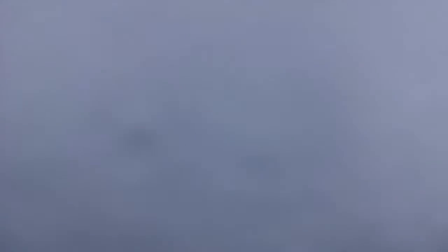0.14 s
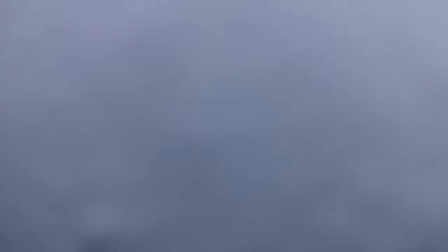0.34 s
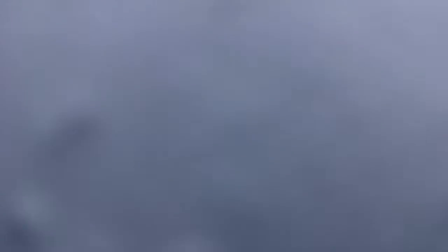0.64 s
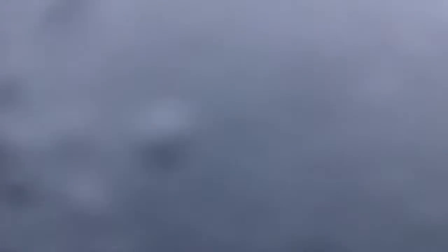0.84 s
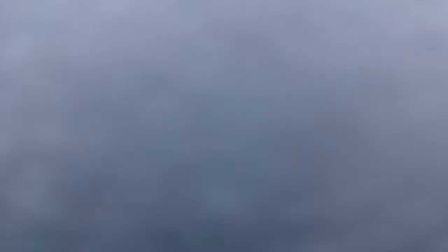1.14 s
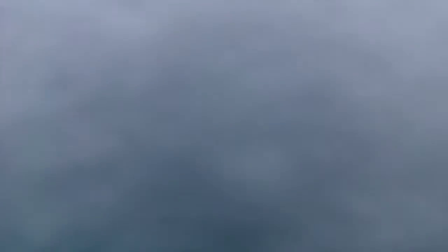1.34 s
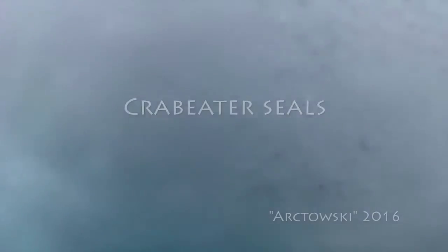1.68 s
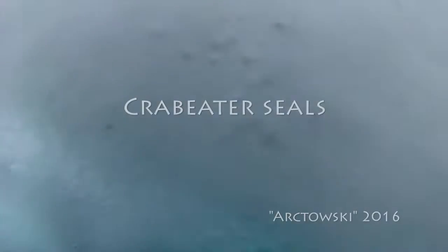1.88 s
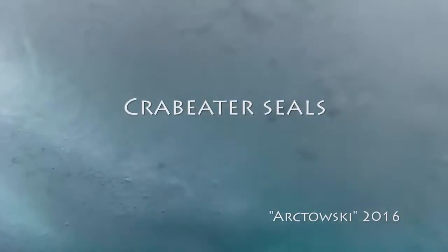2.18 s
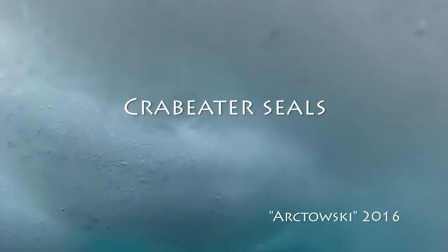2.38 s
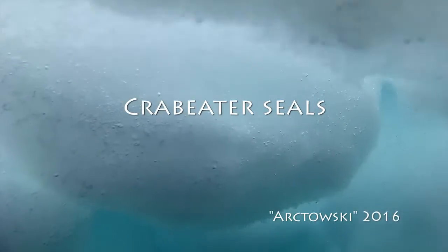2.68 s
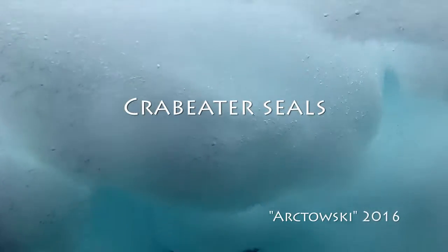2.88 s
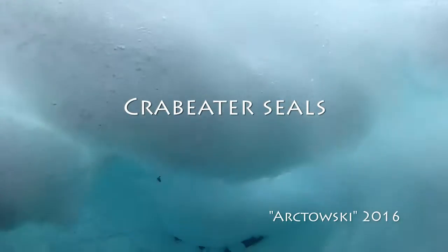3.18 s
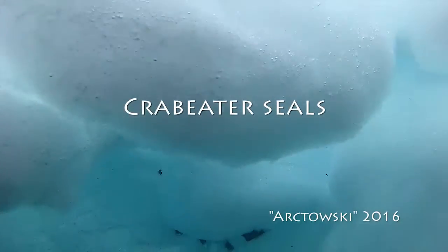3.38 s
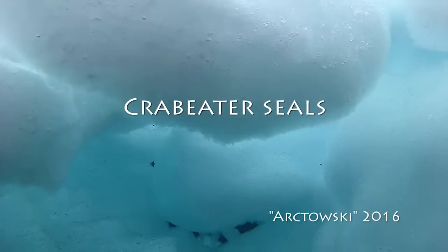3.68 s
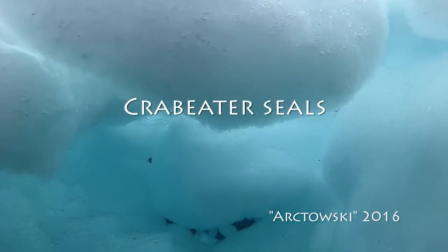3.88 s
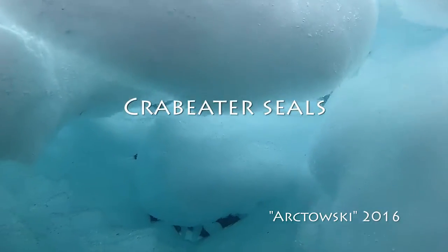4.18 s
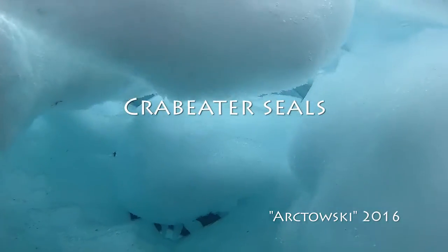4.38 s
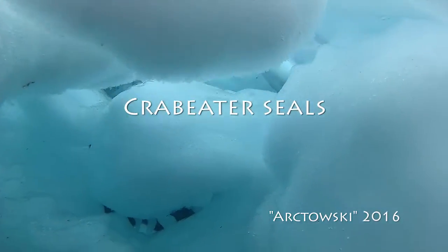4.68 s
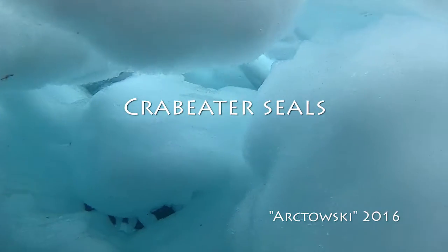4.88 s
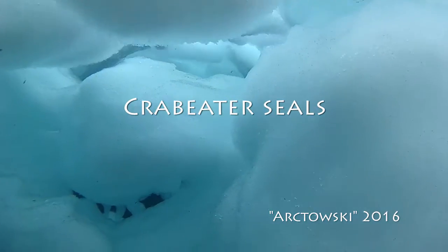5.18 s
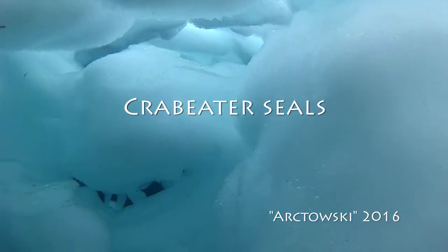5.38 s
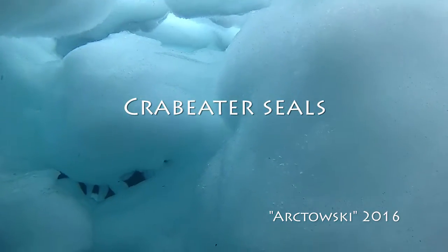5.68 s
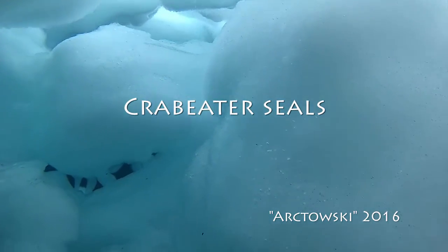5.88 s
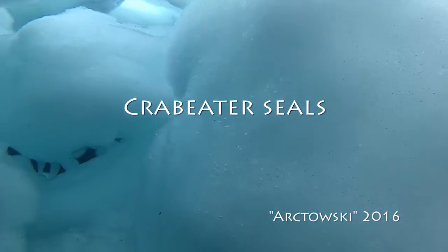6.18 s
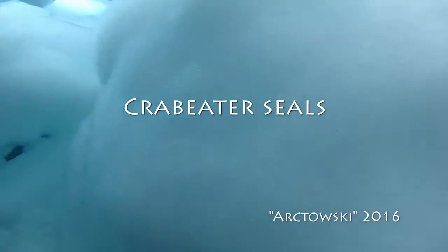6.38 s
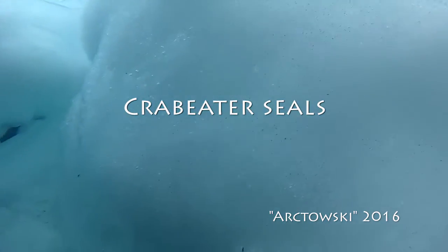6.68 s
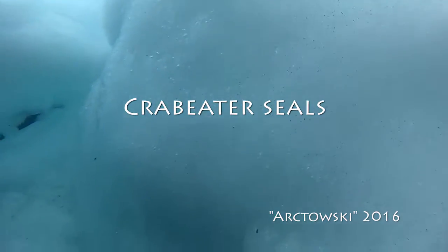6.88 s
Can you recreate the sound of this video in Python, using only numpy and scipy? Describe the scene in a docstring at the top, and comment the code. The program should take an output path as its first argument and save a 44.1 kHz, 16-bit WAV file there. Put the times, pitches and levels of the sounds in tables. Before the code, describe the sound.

Dense sharp ice cracks and popping bubbles up close, a buzzing creak, sparse knocks and scraping, then an abrupt stop leaving faint wind-like rumble.

```python
"""Brash ice crackles and snaps against the housing of a camera dipping into icy water, then thins out.
Close by, air pops, bubbles knock and blocks clonk, all as short dying sines; the crackle is random clicks in clumps.
A pulsing drone, probably ice creaking as it sticks and slips, rings the housing once per slip; ice scrapes further off.
The underwater sound stops dead after six seconds, leaving filtered noise: a low rumble like wind on the microphone."""
import sys
import numpy as np
from scipy import signal
from scipy.fft import rfft, irfft
from scipy.io import wavfile
from scipy.ndimage import uniform_filter1d

SR = 44100
rng = np.random.default_rng(int(sys.argv[2]) if len(sys.argv) > 2 else 0)


def wav_record(signal):
    """Record a signal, one row per channel, as 16-bit PCM in the file named by sys.argv[1]."""
    frames = np.transpose(np.atleast_2d(signal))
    bounded = np.clip(frames, -1, 1)
    # unit amplitude maps onto the largest positive 16-bit level
    quanta = np.round(bounded * 32767).astype(np.int16)
    wavfile.write(sys.argv[1], SR, quanta)


N = 310905
TIME = np.arange(N) / SR


def amp(db):
    """Decibels to a linear gain."""
    return 10 ** (np.asarray(db) / 20)


def evened(x):
    """Scales to rms 1."""
    return x / np.sqrt(np.mean(x ** 2) + 1e-20)


def peaked(x):
    """Scales to peak 1."""
    return x / abs(x).max()


def noise():
    """White noise for the whole scene."""
    return rng.standard_normal(N)


def curve(rows):
    """Second column of a table of times, at every sample."""
    rows = np.asarray(rows)
    return np.interp(TIME, rows[:, 0], rows[:, 1])


def add(mix, s, sound):
    """Adds a sound into the mix at s seconds."""
    part = mix[max(round(s * SR), 0):][:len(sound)]
    part += sound[:len(part)]


def ramp(start, length):
    """Rises straight from 0 to 1."""
    return np.clip((TIME - start) / length, 0, 1)


def surge(start, end, db, rise, fall):
    """Exponential attack, a hold from start to end, exponential release."""
    before, after = np.maximum(start - TIME, 0), np.maximum(TIME - end, 0)
    return amp(db) * np.exp(-before / rise - after / fall)


def together(gains):
    """Sums envelopes by power."""
    return np.sqrt(sum(gain ** 2 for gain in gains))


def colour(x, points, size=4096):
    """Causal minimum-phase filter with the given spectrum."""
    hz, db = np.transpose(points)
    bins_hz = abs(np.fft.fftfreq(size, 1 / SR))
    log_gain = np.log(amp(np.interp(np.log(bins_hz + 1), np.log(hz), db)))
    taps = np.fft.ifft(np.exp(np.conj(signal.hilbert(log_gain)))).real[:size // 2]
    return signal.oaconvolve(x, taps)[:len(x)]


def band(x, lo_hz, hi_hz, order=2):
    """Butterworth band-pass."""
    edges = [lo_hz, min(hi_hz, .45 * SR)]
    return signal.sosfilt(signal.butter(order, edges, "band", fs=SR, output="sos"), x)


def drift(per_s):
    """Slow random wander of rms 1, with little above per_s hertz."""
    rolloff = 1 + (np.fft.rfftfreq(N, 1 / SR) / per_s) ** 4
    return evened(irfft(rfft(noise()) / rolloff, N))


def clicks(per_s, spread_db):
    """Random clicks, many small and a few large, equally loud however dense."""
    size = amp(spread_db * np.minimum(rng.exponential(1, N), 3.5))
    sign = rng.choice([-1, 1], N)
    present = rng.random(N) < per_s / SR
    return evened(size * sign * present / np.sqrt(per_s))


BUBBLE_RISE_MAX = 0.07  # greatest share by which a pitch rises


def ring(t, hz, t60, swell, glide=0):
    """A dying sine with a soft start, which may glide upward."""
    turns = hz * (t + np.cumsum(np.minimum(glide * t, BUBBLE_RISE_MAX)) / SR)
    decay = np.exp(-np.log(1000) * t / t60)
    return np.sin(2 * np.pi * turns) * decay * (1 - np.exp(-(t / swell) ** 2))


def pops(lo_hz, hi_hz, per_s, cycles, count=10):
    """Tiny bubbles of many sizes, each ringing a few cycles at its own pitch; rms 1."""
    t = np.arange(1500) / SR
    total = 0
    for hz in np.geomspace(lo_hz, hi_hz, count):
        starts = clicks(per_s / count, spread_db=2.0)
        total = total + signal.oaconvolve(starts, ring(t, hz, cycles / hz, 1 / hz))[:N]
    return evened(total)


# Sharp cracks of ice. Each row: start in seconds, snap peak in dB, centre in Hz,
# low thud and bright edge in dB relative to the snap, before the trims thud_db and edge_db.
CRACKS = [(0.101, -14, 1350, -4, -41), (0.1232, -22.5, 1500, -0.5, -24), (0.165, -6.5, 1990, -7.5, -24),
          (0.3683, -10.5, 1690, -23, -27), (0.4292, -13, 2010, -19.5, -14), (0.435, -5, 1770, -17.5, -17),
          (0.4402, -10, 1460, -1.5, -21.5), (0.4596, -14.5, 1830, -3, -39.5),
          (0.4837, -10.5, 1350, -16, -22.5), (0.5794, -15, 1610, -6, -11.5), (0.6431, -19, 1680, -9, -18),
          (0.6773, -14, 1830, -34, -5.5), (0.7302, -5.5, 1930, -11.5, -13), (0.756, -7, 1810, -12, -15),
          (0.7629, -18, 1510, 0.5, -12), (1.189, -17.5, 1460, -47, -7.5), (1.3304, -20, 3470, -39, -3),
          (1.631, -25, 1440, -25, -2.5), (1.909, -28, 2570, -18, -2), (2.1032, -25.5, 1780, -40, -7.5),
          (2.705, -24.5, 1460, -25, -3), (3.3135, -34, 1250, -21, -23.5), (3.341, -38, 1860, -6, -16),
          (4.957, -37.5, 2000, -14, -12)]
# Spectrum of ice breaking close to the housing. Each row: frequency in Hz, gain in dB.
CRACKLE_COLOUR = [(35, -56), (60, -24), (249, -12), (325, -4), (456, -13), (606, 6.5), (737, -4),
                  (880, -19.5), (997, -7.5), (1210, -8.5), (1450, 1), (1860, 0), (2510, -11), (2950, -4),
                  (4210, -16), (5470, -67), (9260, -120)]
# Spectrum of splintering ice. Each row: frequency in Hz, gain in dB.
EDGE_COLOUR = [(300, -54), (1500, -10.5), (2500, 3.5), (3400, 4.5), (4300, -14.5), (5700, -22),
               (7800, -50.5), (10000, -44), (13000, -54.5)]


def cracks(scatter=0.073, scatter_s=0.0044, pop_t60=0.011, pop_db=1, thud_db=1, thud_hz=470, edge_db=3):
    """Each crack is a snap and a brief pitched pop, with splinters, a bright edge and a thud on the housing."""
    out, t = np.zeros(N), np.arange(2048) / SR
    for s, db, hz, low_db, high_db in CRACKS:
        splinters = scatter * rng.standard_normal(len(t)) * np.exp(-t / scatter_s)
        burst = splinters + (t == 0)  # the first break is a single click
        snap = evened(band(colour(burst, CRACKLE_COLOUR), hz / 1.55, hz * 1.166))
        snap = peaked(snap + amp(pop_db) * evened(ring(t, hz, pop_t60, 0.00073)))
        thud = evened(band(band(burst, 310, 840, order=1), 40, 1100))
        thud = evened(thud + 0.42 * evened(ring(t, thud_hz, 0.0062, 0.00012)))
        edge = evened(colour(burst, EDGE_COLOUR))
        extras = amp(low_db + thud_db) * thud + amp(high_db + edge_db) * edge
        add(out, s, amp(db) * (snap + snap.std() * extras))
    return out


# Small bright ticks, like air escaping the ice. Each row: start in seconds, peak in dB.
TICKS = [(1.979, -29), (2.129, -32.5), (2.3882, -34.5), (2.418, -23.5), (2.436, -34.5), (2.569, -45),
         (2.682, -40.5), (2.762, -44.5), (3.4813, -38), (3.532, -45.5), (4.195, -45), (4.864, -36),
         (4.925, -40)]


def ticks():
    """Each tick is a burst of noise dying within milliseconds, coloured like splintering ice."""
    out, t = np.zeros(N), np.arange(2048) / SR
    for s, db in TICKS:
        burst = rng.standard_normal(len(t)) * np.exp(-t / 0.002)
        add(out, s, amp(db) * peaked(colour(burst, EDGE_COLOUR)))
    return out


# Speed of the creak. Each row: time in seconds, slips per second.
SLIP_RATE = [(0.857, 44.935), (1.435, 34.65), (1.644, 34.59), (1.882, 59.01), (2.386, 61.68),
             (2.939, 57.21), (3.072, 58.8), (3.402, 39.4), (5.226, 45.66), (5.419, 41.35), (5.646, 48.34),
             (6.1, 45.24)]


def slip_train():
    """One unit click for each slip of the creaking ice, slightly uneven in time."""
    jitter = .008 * drift(per_s=35)  # in slips
    started = TIME > SLIP_RATE[0][0]
    turns = np.cumsum(curve(SLIP_RATE) * started) / SR + jitter
    return np.diff(np.floor(np.maximum(turns, 0)), prepend=0)


# The fine crackle falls into step with the creak: burst decay (s), share of power, start (s), fade-in (s)
BURST_S, BURST_SHARE, BURST_START_S, BURST_FADE_S = .0025, .6, 1.3, .7


def bunching(slips):
    """Gain that gathers the fine crackle into a short burst at each slip."""
    decay = np.exp(-np.arange(1500) / SR / BURST_S)
    bursts = signal.oaconvolve(slips, decay)[:N] / (BURST_S * curve(SLIP_RATE))
    share = BURST_SHARE * ramp(BURST_START_S, BURST_FADE_S)
    return uniform_filter1d(np.sqrt(1 - share + share * abs(bursts)), size=60)


GRIND_END_S, GRIND_FADE_S, GRIND_DROP_DB = 1, 0.12, 11  # grinding drops as the ice lets go of the housing
CRACKLE_END_S, HANDOVER_S = 2.47, 0.029  # the near crackle gives way to the far scraping
CRUNCH_RISE_S, CRUNCH_FALL_S = 0.0031, 0.0081
# How hard the ice crackles, before the layer trims. Each row: time in seconds, level in dB.
CRACKLE = [(0.0, -31.5), (0.078, -41.5), (0.085, -32), (0.12, -34), (0.63, -31), (0.89, -33.5), (1.06, -33),
           (1.14, -34.5), (1.28, -38.5), (1.37, -47), (1.98, -44), (2.15, -49), (2.28, -54), (2.41, -58)]
# Pieces crushed against the housing, each a short rush of crackle.
# Each row: start in seconds, length in seconds, level in dB before the layer trims.
CRUNCHES = [(0.107, 0.023, -26), (0.179, 0.038, -32.5), (0.769, 0.026, -27), (2.298, 0.19, -54)]
# Tiny fractures. Each row: time in seconds, fractures per second.
FRACTURES = [(1.2, 1400), (1.5, 1200), (2.2, 900)]
# Spectrum of the fizz. Each row: frequency in Hz, gain in dB.
FIZZ_COLOUR = [(2000, -26), (3200, 4.5), (3700, 7), (4400, -10), (5700, -15.5), (7000, -36.5), (8000, -47),
               (10000, -33), (12500, -47)]


def crackle(slips, level_db=-1, grind_db=-12.5, fizz_db=-13, clump_db=1.0, pops_db=-1, gurgle_db=-2):
    """Clumps of tiny fractures and bubbles over hiss, with coarse grinding and gurgling below and fizz above."""
    bursts = bunching(slips)
    clumps = amp(clump_db * drift(per_s=80)) * bursts
    hiss = .25 * noise()
    fractures = (clicks(per_s=curve(FRACTURES), spread_db=2.2) + hiss) * clumps
    body = evened(band(colour(fractures, CRACKLE_COLOUR), 780, 3850, order=4))
    popping = pops(1250, 2100, per_s=200, cycles=12) + .5 * pops(2300, 3500, per_s=200, cycles=21)
    body = body + amp(pops_db) * bursts * evened(popping)

    coarse = clicks(per_s=240, spread_db=4.5) * clumps
    grind = evened(band(colour(coarse, CRACKLE_COLOUR), 130, 720, order=3))
    grind = grind + amp(gurgle_db) * pops(470, 680, per_s=47, cycles=6.3)
    contact_db = -GRIND_DROP_DB * ramp(GRIND_END_S, GRIND_FADE_S)
    fizz = evened(colour(fractures, FIZZ_COLOUR))

    crunches = [surge(s, s + length, db, CRUNCH_RISE_S, CRUNCH_FALL_S) for s, length, db in CRUNCHES]
    effort = together([amp(curve(CRACKLE))] + crunches)
    sound = body * amp(level_db) + grind * amp(grind_db + contact_db) + fizz * amp(fizz_db)
    return sound * effort * (1 - ramp(CRACKLE_END_S - HANDOVER_S, HANDOVER_S))


# Pitched pops of air set free from the ice. Each row: start in seconds, peak in dB, pitch in Hz.
POPS = [(0.2529, -11, 1554), (.3476, -21.5, 1630), (.494, -10, 2670), (0.5161, -14.5, 1460),
        (.5531, -19, 1420), (0.9603, -11.5, 1570), (1.055, -20.5, 1810), (1.1436, -14, 1550),
        (1.1614, -25, 1760), (1.5951, -23.5, 1560), (2.2097, -29, 1560), (3.353, -35.5, 1890),
        (4.899, -36, 2180), (4.907, -35, 1990), (5.9779, -29.5, 1290)]


def air_pops(t60=0.014, swell=0.00068, snap_db=-4):
    """Each pocket of air opens with a small snap and rings a few cycles."""
    out, t = np.zeros(N), np.arange(2048) / SR
    snap = peaked(band(colour(1.0 * (t == 0), CRACKLE_COLOUR), 900, 3200))
    for s, db, hz in POPS:
        pop = peaked(ring(t, hz, t60, swell)) + amp(snap_db) * snap
        add(out, s, amp(db) * peaked(pop))
    return out


# Bubbles knocking near the housing. Each row: start in seconds, level in dB before band-pass and overload,
# starting pitch in Hz, t60 in seconds, tick in dB relative to the ring.
KNOCKS = [(.111, -14.5, 654, 0.041, -16), (.339, -23, 447, 0.032, -19), (.5365, -12, 563, 0.01, -17),
          (1.06, -15.5, 577, 0.048, -14), (1.083, -16, 584, 0.033, -10.5), (2.4165, -0.5, 663, 0.045, -27),
          (5.0695, -31, 556, 0.16, -17), (5.151, -31.5, 574.6, 0.24, -19),
          (5.165, -31.5, 595, 0.082, -22.5), (5.327, -33.5, 587, 0.13, -17)]
BUBBLE_RISE_PER_S = 1.7  # a bubble's pitch climbs as it nears the surface
RISING_T60 = .06  # only bubbles that ring more briefly than this (s) rise


def bubbles(overload_db=-9, buzz_db=11, swell=.0015):
    """Bubbles ring briefly with a tick; the strongest overloads the microphone and adds an overtone."""
    out, t = np.zeros(N), np.arange(6000) / SR
    for s, db, hz, t60, tick_db in KNOCKS:
        burst = rng.standard_normal(len(t)) * np.exp(-t / 0.0065)
        tick = peaked(band(burst, 1200, 1760, order=4))
        glide = BUBBLE_RISE_PER_S * (t60 < RISING_T60)
        add(out, s, amp(db) * (ring(t, hz, t60, swell, glide) + amp(tick_db) * tick))
    out = band(out, 500, 3500)
    limit = amp(overload_db)
    excess = np.clip(out, -limit, limit) - out
    return out + amp(buzz_db) * band(excess, 1750, 2200, order=3)


# Blocks of ice clonking together. Each row: start in seconds, peak in dB, pitch of the blow in Hz,
# snap in dB relative to the blow, ringing of the block in dB relative to blow and echo.
CLONKS = [(1.9445, -13, 630, -3.5, -16.5), (3.4811, -13.5, 790, 4.5, -17.5)]
# Modes of a block. Each row: pitch in Hz, level in dB, t60 in seconds.
BLOCK = [(556, -6.5, 0.063), (723, -5.5, 0.042), (907, -11, .055), (1143, 1.5, 0.028)]


def clonks(blow_t60=0.0072, snap_hz=1450, snap_t60=0.0037, echo_s=0.001733, echo=0.66, swell=0.00017):
    """A short blow with a snap, doubled by its echo off the surface, leaves the block ringing."""
    out, t = np.zeros(N), np.arange(4000) / SR
    modes = peaked(sum(amp(db) * ring(t, hz, t60, echo_s) for hz, db, t60 in BLOCK))

    def blow(u, hz, snap_db):
        """The dying blow with its snap."""
        return ring(u, hz, blow_t60, swell) + amp(snap_db) * ring(u, snap_hz, snap_t60, swell)

    for s, db, hz, snap_db, ring_db in CLONKS:
        mirrored = blow(np.maximum(t - echo_s, 0), hz, snap_db)
        struck = peaked(blow(t, hz, snap_db) + echo * mirrored)
        add(out, s, amp(db) * peaked(band(struck + amp(ring_db) * modes, 610, 1490, order=3)))
    return out


# The creak comes in swells. Each row: start and end of the hold in seconds, pulse peak in dB before unevenness,
# rise time and fall time in seconds, low thump in dB relative to the pulse.
SWELLS = [(0.869, 1.03, -29.5, .01, 0.033, -13), (1.454, 2.4, -35.5, 0.013, 0.13, -18.5),
          (2.591, 2.969, -34, .015, 0.17, -18.5), (3.123, 3.226, -53, 0.032, 0.029, 3),
          (3.377, 3.437, -39.5, 0.046, 0.009, -11), (5.047, 6.103, -39.5, 0.21, .02, -7)]
# Modes of the housing. Each row: pitch in Hz, level in dB, t60 in seconds.
HOUSING = [(616.5, 4.5, 0.022), (1139, -7.5, 0.043), (1460, -22.5, 0.0071), (1855, -15.5, 0.029)]
CREAK_BED_DB = -71  # faint creak between swells
THUMP_HZ, THUMP_T60 = 316, 0.0066


def creak(slips, echo_s=0.0015, echo=0.58, far_db=-11):
    """Each slip rings the housing twice, directly and off the surface, over a low thump; later the ice smears it."""
    jolts = slips * amp(.7 * drift(per_s=40))  # slightly uneven strength
    pulses = jolts * together([amp(CREAK_BED_DB)] + [surge(*row) for *row, low_db in SWELLS])
    pushes = jolts * together([surge(*row) * amp(low_db) for *row, low_db in SWELLS])

    t = np.arange(1500) / SR
    late = np.maximum(t - echo_s, 0)
    housing = sum(amp(db) * (ring(t, hz, t60, 0.00073) + echo * ring(late, hz, t60, 0.0013))
                  for hz, db, t60 in HOUSING)
    direct = signal.oaconvolve(pulses, peaked(band(housing, 290, 3000)))[:N]
    thump = peaked(band(ring(t, THUMP_HZ, THUMP_T60, 0.00054), 210, 650))
    low = signal.oaconvolve(pushes, thump)[:N]

    smear = np.interp(TIME, [3, 5], [.1, 1])  # grows from 3 to 5 s
    tails = signal.oaconvolve(pulses, np.exp(-t / .008))[:N] * smear
    wash = evened(band(noise(), 560, 728, order=3)) + .5 * evened(band(noise(), 1150, 1400))
    return direct + low + amp(far_db) * band(tails * wash, 280, 1300, order=3)


# Hollows in the ice. Each row: pitch in Hz, level in dB, t60 in seconds.
HOLLOW = [(577.3, -3, 0.1), (998, 1.5, 0.034), (1326, -4.5, 0.036), (1925, -10.5, 0.045),
          (3000, -9.5, 0.011)]


def hollow(x):
    """Rings the hollows in the ice."""
    t = np.arange(4000) / SR
    modes = sum(amp(db) * ring(t, hz, t60, 0.0016) for hz, db, t60 in HOLLOW)
    return signal.oaconvolve(x, modes)


# Strokes of ice scraping further off. Each row: time of the peak in seconds, level in dB before level_db,
# rise time and fall time in seconds.
SCRAPES = [(3.002, -52, 0.71, 0.63), (3.351, -51, 0.018, 0.09), (3.682, -51.5, 0.021, 0.059),
           (4.25, -60, 0.18, 0.059), (4.8, -50.5, 0.39, 0.25), (6.03, -50, 0.42, 0.4)]
SCRAPE_BED_DB = -78.5  # the churn between strokes, before level_db
# Spectrum of scraping through the housing. Each row: frequency in Hz, gain in dB.
SCRAPE_COLOUR = [(60, -28), (200, -5), (400, -16.5), (580, 5), (800, -2), (1020, 1.5), (1180, 1.5),
                 (1400, 7), (1800, 0.5), (2500, -7), (3200, -6), (4300, -30), (7000, -69)]
# Brief high squeaks of rubbed ice. Each row: start in seconds, length in seconds, level in dB, centre in Hz.
SQUEAKS = [(3.744, 0.059, -59, 3460), (4.866, 0.0187, -50, 2950)]


def scrape(level_db=-1.5, pops_db=1.0, hollow_db=-4):
    """Dense soft grains through the housing and the ice's hollows, bubbling toward the end, and a few squeaks."""
    clumps = amp(1.8 * drift(per_s=45))
    rubs = clicks(per_s=2000, spread_db=3) + .9 * clicks(per_s=220, spread_db=3.5)
    grains = evened(colour(rubs * clumps, SCRAPE_COLOUR))
    hollows = evened(hollow(clicks(per_s=240, spread_db=1.5) * clumps)[:N])
    bubbling = amp(pops_db) * pops(1070, 1420, per_s=130, cycles=29) * ramp(5, 1)
    strokes = [surge(s, s, db, rise, fall) for s, db, rise, fall in SCRAPES]
    effort = amp(level_db) * together([amp(SCRAPE_BED_DB)] + strokes)
    sound = effort * (grains + amp(hollow_db) * hollows + bubbling)
    sound = sound * ramp(CRACKLE_END_S - HANDOVER_S, HANDOVER_S)

    catches = clicks(per_s=500, spread_db=1)
    for s, length, db, hz in SQUEAKS:
        rub = band(catches[round(s * SR):][:round(length * SR)], hz / 1.19, hz * 1.07, order=3)
        add(sound, s, amp(db) * evened(rub) * signal.windows.tukey(len(rub), .2))
    return sound


# Hollow knocks of floes jostling. Each row: start in seconds, length of the rattle in seconds, level in dB.
JOSTLES = [(4.616, 0.023, -48.5), (4.673, 0.021, -46.5), (4.754, 0.022, -46), (4.926, 0.007, -34.5),
           (4.957, 0.028, -42.5), (5.068, 0.022, -43.5), (5.144, 0.029, -42.5)]


def jostles(per_s=900):
    """Floes touch in a quick run of slips that rings the hollows between them."""
    out, slips = np.zeros(N), clicks(per_s=per_s, spread_db=2.0)
    for s, length, db in JOSTLES:
        run = slips[round(s * SR):][:round(length * SR)]
        sound = hollow(run)
        # the level counts the energy over the run alone, without the ring-out
        add(out, s, amp(db) * evened(sound) * np.sqrt(len(run) / len(sound)))
    return out


def bump(start_s=4.955, db=-33, hz=165, t60=0.1, swell=0.0012):
    """One dull, low bump of a floe, a dying sine."""
    out = np.zeros(N)
    add(out, start_s, amp(db) * ring(np.arange(8000) / SR, hz, t60, swell))
    return out


RUMBLE_START_S, RUMBLE_FULL_S = 2.62, 4.923  # the rumble fades in, then keeps growing
OPPOSED_DB, OPPOSED_DB_PER_S = -45.5, 3.5  # part that pushes the ports opposite ways, at the end of the fade
SHARED_DB, SHARED_DB_PER_S = -65.5, 12  # part shared by both ports, at the end of the fade
# Spectrum shared by both microphone ports. Each row: frequency in Hz, gain in dB.
RUMBLE_COLOUR = [(15, -57.5), (25, -51), (54, -10), (155, -4.5), (415, -26), (585, -30.5), (861, -34.5),
                 (4210, -61.5), (5470, -103), (9260, -120)]
# Spectrum that pushes the ports opposite ways. Each row: frequency in Hz, gain in dB.
OPPOSED_COLOUR = [(15, -53), (25, -28), (152, -2), (415, -15.5), (695, -26.5), (880, -27), (1270, -32),
                  (1500, -32), (4210, -54.5), (5470, -53.5), (9260, -120)]
# Low buffets on the microphone. Each row: time of the peak in seconds, level in dB,
# rise time and fall time in seconds, share of power that is opposed from 0 to 1.
BUFFETS = [(6.15, -52, 0.12, 0.039, 0.3), (6.64, -36.5, 0.026, 0.14, 0.63), (6.96, -42, 0.078, 0.096, 0.7)]


def turbulence(points, gust_db=2.0):
    """Coloured noise with a lumpy level, rms 1."""
    return evened(colour(noise(), points) * amp(gust_db * drift(per_s=13.2)))


def rumble():
    """Lumpy low turbulence that fades in and grows; most of it pushes the two ports opposite ways."""
    fade, since = ramp(RUMBLE_START_S, RUMBLE_FULL_S - RUMBLE_START_S), TIME - RUMBLE_FULL_S
    shared_gains = [fade * amp(SHARED_DB + SHARED_DB_PER_S * since)]
    opposed_gains = [fade * amp(OPPOSED_DB + OPPOSED_DB_PER_S * since)]
    for s, db, rise, fall, share in BUFFETS:
        gain = surge(s, s, db, rise, fall)
        shared_gains.append(gain * np.sqrt(1 - share))
        opposed_gains.append(gain * np.sqrt(share))
    shared = turbulence(RUMBLE_COLOUR) * together(shared_gains)
    opposed = turbulence(OPPOSED_COLOUR) * together(opposed_gains)
    return np.array([shared + opposed, shared - opposed])


# Spectrum of the steady noise floor. Each row: frequency in Hz, gain in dB.
FLOOR_COLOUR = [(25, -1.5), (60, -7), (200, -11), (1000, -20.5), (4500, -26.5), (8000, -34.5),
                (10000, -30.5), (12500, -34.5)]


def floor(db=-77):
    """Faint steady noise, the same in both channels."""
    return amp(db) * evened(colour(noise(), FLOOR_COLOUR))


CUT_S, CUT_FADE_S = 6.105, 0.0086  # the underwater sound is gone at CUT_S, after a very short fade


def scene():
    """Everything underwater up to the cut, over the floor and the rumble."""
    slips = slip_train()
    ice = cracks() + ticks() + crackle(slips) + clonks() + creak(slips) + scrape() + jostles() + bump()
    underwater = ice + air_pops() + bubbles()
    return underwater * np.clip((CUT_S - TIME) / CUT_FADE_S, 0, 1) + floor() + rumble()


EDGE_HZ = 13000


def record(dry):
    """The recorder's band limit, a steep low-pass."""
    taps = signal.firwin(511, EDGE_HZ, window=("kaiser", 9), fs=SR)
    return signal.oaconvolve(dry, taps[None], "same")


dry = scene()
out = record(dry)
wav_record(out)
```